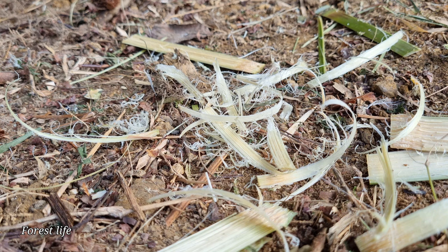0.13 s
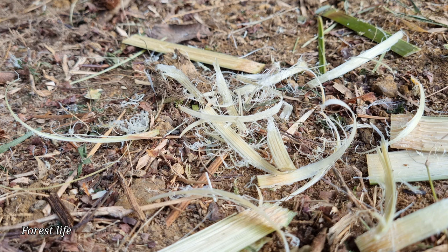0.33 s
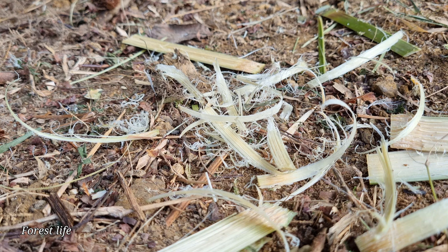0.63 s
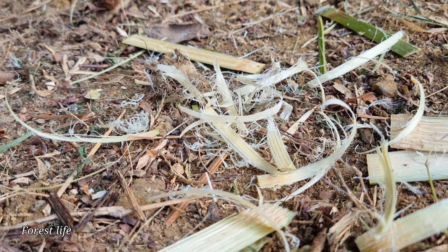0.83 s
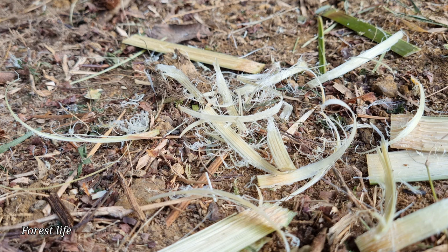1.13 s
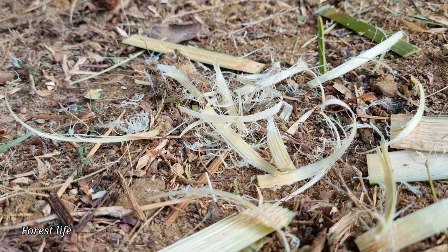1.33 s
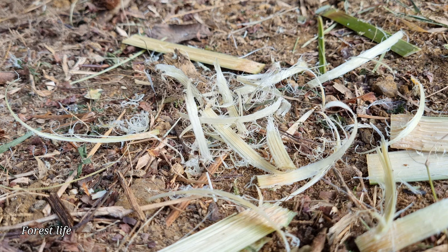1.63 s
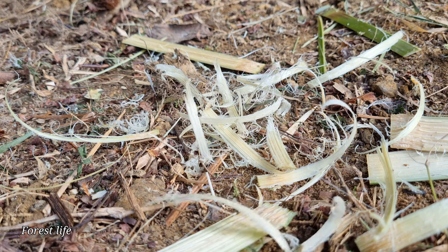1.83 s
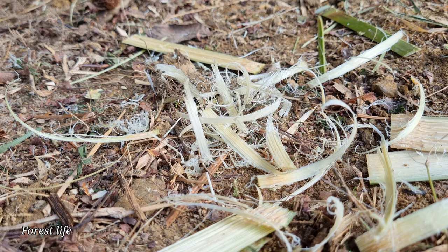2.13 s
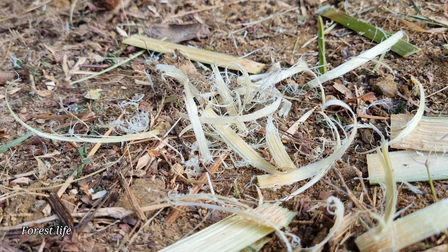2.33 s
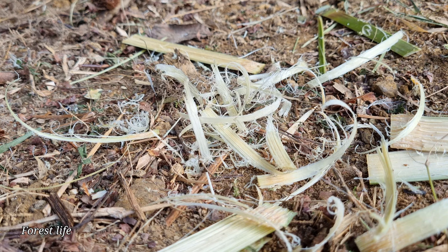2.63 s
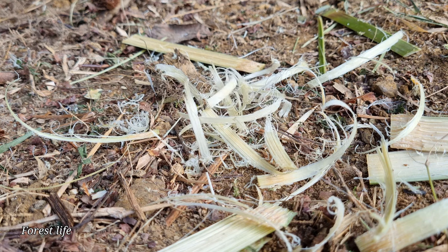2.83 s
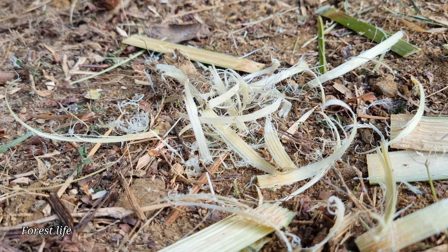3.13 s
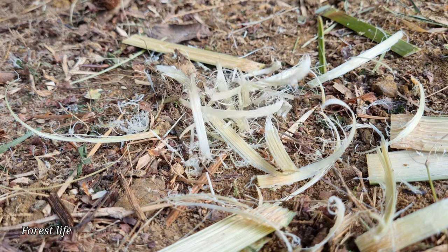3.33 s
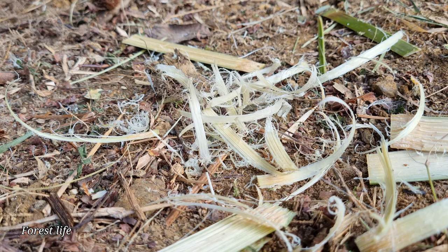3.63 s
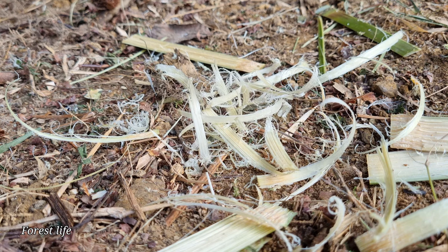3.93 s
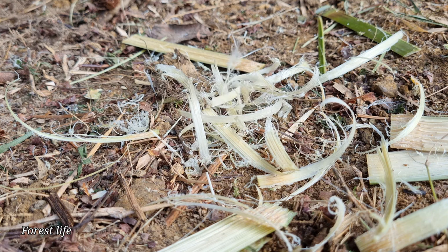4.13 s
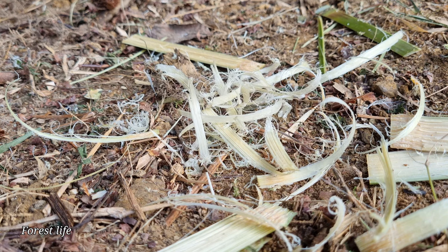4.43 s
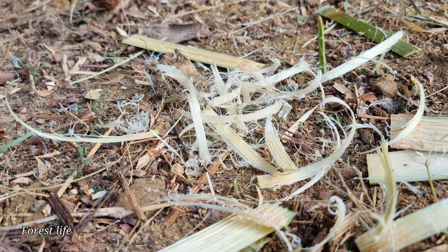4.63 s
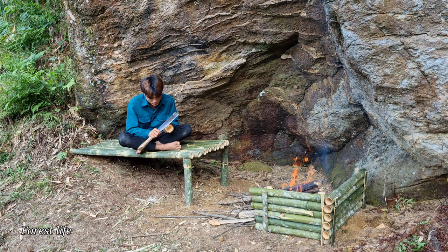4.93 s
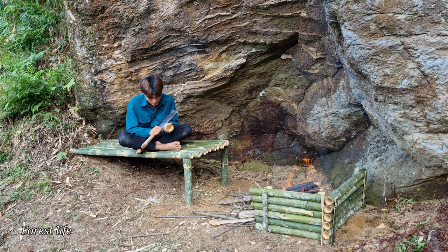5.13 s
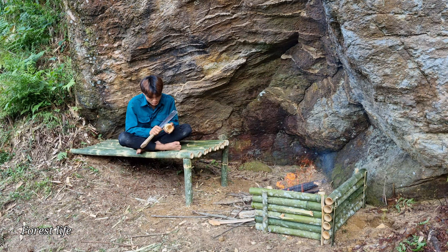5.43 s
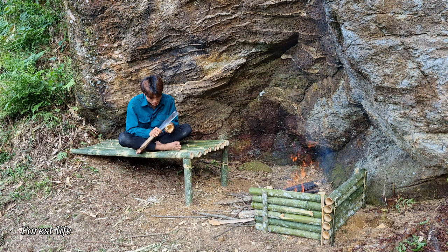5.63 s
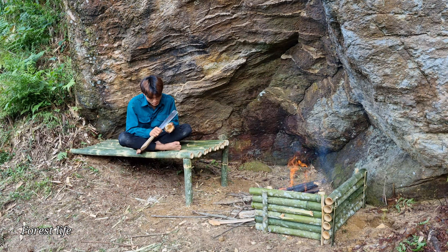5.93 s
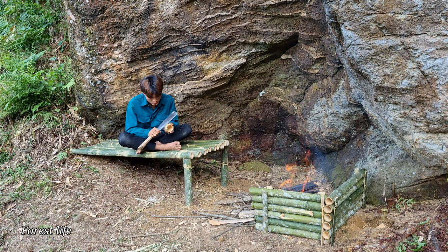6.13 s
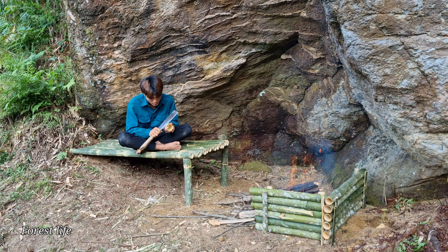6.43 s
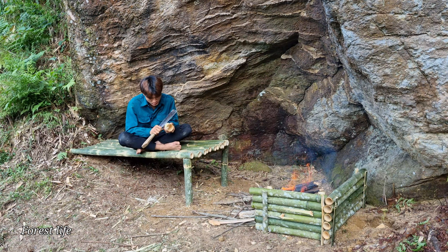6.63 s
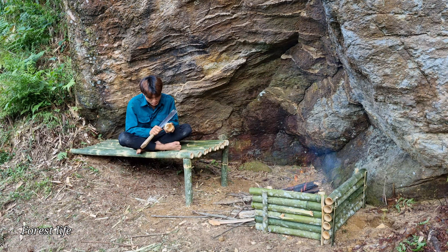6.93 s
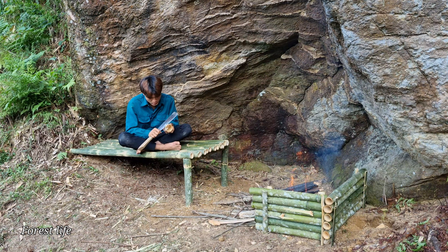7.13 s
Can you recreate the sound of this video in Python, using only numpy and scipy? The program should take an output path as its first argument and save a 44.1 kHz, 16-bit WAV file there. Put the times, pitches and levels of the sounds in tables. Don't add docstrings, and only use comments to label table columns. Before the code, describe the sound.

A close stereo pair beside a rock overhang hears a machete working down a bamboo tube. From 0 s the edge slips over fibres in short, bright, gritty hisses, with a thin steel ring and a slight hollow hum. The rasp swells rapidly into a sharp, woody crack at about 0.8 s, then again near 1.6, 2.3, 3.1, 3.8, 4.6 and 5.0 s; the fourth is softest and the last comes sooner. Cracks are dry and hollow, with splintering on top and very short stone and ground echoes. Light blade knocks and faint draws fill the gaps. Soft leaf hiss and low wind run beneath. Around 5.1-5.2 s the work ends and the background crossfades to a quieter, more distant spot: even forest hiss, weaker wind and fine, fluttering high insect sizzle until about 7.4 s.

```python
import sys
import numpy as np
from scipy import signal
from scipy.io import wavfile
from scipy.ndimage import uniform_filter1d

SR = 44100
rng = np.random.default_rng(int(sys.argv[2]) if len(sys.argv) > 2 else 0)


def store_pcm(level_fs):
    pcm = np.round(np.clip(level_fs, -1, 1) * 32767).astype(np.int16)
    wavfile.write(sys.argv[1], SR, np.atleast_2d(pcm).T)


def natural_amplitude(level_db):
    exponent = np.asarray(level_db, float) / 20
    return 10 ** exponent


N = 321475

# full_pressure_s, hold_s, fibre_hiss_db,
# edge_ring_db, tube_hum_db (last two relative to the hiss)
LANDING_SLIDES = [
    (0.002, .01, -42, -9, -6),
    (0.966, 0.03, -39, -5.5, -6.5),
    (1.762, 0.019, -37, -9, -6.5),
    (2.52, 0.019, -45.5, -6, 0.5),
    (3.203, .02, -38, -6.5, -6),
    (3.975, 0.01, -43.5, -9, -2),
    (4.753, .03, -51.5, -4, 0.5),
    (5.12, 0.023, -67, -7, 11),
]
DRAW_SLIDES = [
    (0.155, 0.0031, -38, 2.5, 0),
    (0.425, 0.051, -33.5, -5, -2.5),
    (1.19, 0.009, -32, -5, -5.5),
    (1.946, .04, -34.5, -3, -3),
    (2.7, 0.024, -35.5, -3, -3.5),
    (3.42, 0.017, -36.5, -2.5, 0.5),
    (4.184, 0.041, -39, -4, -0.5),
]
AIM_SLIDES = [
    (0.319, .005, -50, 1, 4),
    (0.6, 0.0084, -39, -5, -7),
    (1.397, .005, -46, -7, 2.5),
    (2.128, 0.0058, -44.5, -3, 1.5),
    (2.883, .01, -46, -7, -4),
    (3.63, 0.05, -48, -3.5, -2),
    (4.382, 0.014, -45.5, -4, -2.5),
]
SHAVE_SLIDES = [
    (0.716, 0.094, -35, -4, -4.5),
    (1.505, 0.051, -29.5, -4, -8),
    (2.262, 0.032, -32, -3, -4.5),
    (3.025, 0.027, -31, -7.5, -5.5),
    (3.745, .03, -34, -5, -6),
    (4.546, 0.04, -35.5, -4, -0.1),
    (4.955, 0.082, -41, -4, -2),
]
# centre_hz, width_hz, level_db
FIBRE_PEAKS = [(5800, 1800, -7), (8000, 600, -7), (9050, 300, -5), (10300, 2000, -2), (13500, 4000, -2)]
BLADE_PEAKS = [(2700, 700, -6), (3380, 120, 0), (3560, 300, -3), (4080, 250, -4), (4600, 800, -7)]
SPINE_PEAK = [(2005, 90, 0)]
TUBE_PEAKS = [(340, 80, -8), (670, 60, 0), (875, 80, -3), (1400, 600, -1)]
# start_s, blow_db, wall_db, splinter_db, tick_db (last three relative to the blow)
CRACK_EVENTS = [
    (0.805, -18.5, 0, -6.5, -42),
    (1.567, -15.5, -5.5, -6.5, -17),
    (2.3024, -15.5, -4.5, -5.5, -19.5),
    (3.082, -20.5, -4.5, -9.5, -20.9),
    (3.778, -16.5, -6.5, -5.5, -19),
    (4.593, -18.5, -2, -1.5, -15.5),
    (5.026, -17.5, -3.5, -7, -16.5),
]
# start_s, wall_db, air_column_db, splinter_db (last two relative)
KNOCK_EVENTS = [(0.418, -28.5, -6, 0), (0.461, -36, 2, -6), (1.507, -38.5, 1, 4.5),
                (1.759, -43.5, -0.5, -5), (1.837, -44, -3, -14), (2.271, -28, -8.2, -3),
                (2.516, -42.5, -9, -13), (3.019, -38.5, -5, 3), (3.207, -59, 10, 0), (3.401, -53, -10, -6),
                (3.75, -36.5, -18, -3), (3.827, -34.5, -4, -1.5), (3.971, -36, -5, -22),
                (4.546, -36.5, -3, -4), (4.657, -34.5, 0, -19), (4.816, -45, 0.5, -20),
                (5.083, -27, -11, -9.5)]
# pitch_hz, level_db, t60_s
AIR_MODES = [(102, -16, 0.084), (162.4, -13.5, 0.081), (240.5, -15, 0.087), (337, -5.5, 0.051),
             (351, 0.5, 0.045), (365, 10, 0.025), (438.3, -7, 0.049)]
WALL_MODES = [(507.4, -9, 0.085), (544.3, 1, 0.061), (633.6, 1.5, 0.047), (677.7, -2, 0.11),
              (735, -16, 0.054), (789, -3.5, 0.092), (870, -5, 0.093), (954, -20.5, 0.1)]
SPLINTER_MODES = [(1090, -23, 0.035), (1252, 5.5, 0.014), (1454, 13.5, 0.019), (1597, 8, 0.016),
                  (1830, -20, 0.018), (1935, 0.5, 0.041), (2122, -11, 0.06), (2288, -11, 0.069),
                  (2542, -9, 0.025), (2840, -11, 0.052), (3028, 4, 0.021), (3590, -8.5, 0.017)]
# delay_s, gain
ECHO_PATHS = [
    [(.0008, 0.41), (.003, 0.52), (.0064, 0.31), (.0095, 0.59), (.019, 0.02)],
    [(.0006, -0.3), (.0029, -0.52), (.0071, 0.58), (.0101, 0.32), (.021, 0.2)],
]
# pitch_hz, t60_s
ROCK_T60 = [(100, .11), (700, .1), (1500, .075), (3000, .09), (6000, .04), (14000, .028)]
# pitch_hz, level_db
NEAR_SPECTRUM = [(76, -48), (130, -1.5), (340, -7), (469, -15.5), (672, -10.5), (889, -19), (1090, -17),
                 (2230, -22.5), (2960, -20), (5620, -22.5), (6210, -21.5), (9840, -15.5), (15600, -18)]
FAR_SPECTRUM = [(76, -17), (130, -8.5), (228, -9), (522, 1), (829, 0), (1490, -3.5), (3010, -10.5),
                (5960, -15), (7440, -14.5), (8070, -13), (8920, -14), (14800, -18.5), (16000, -12.5)]
# pitch_hz, left_right_likeness
LIKENESS = [(60, 0.93), (130, 1), (290, 0.91), (640, 0.37), (1410, 0.52), (3100, 0.1), (6820, 0.29),
            (15000, 0.076)]
# pitch_hz, left_minus_right_db
BALANCE = [(60, 0), (240, 0.5), (950, 0.0), (3770, -0.5), (15000, -4)]
# time_s, level_db
WIND_LEVEL = [(0.0, -51), (0.34, -50), (1.44, -49.5), (1.89, -46), (2.25, -52.5), (2.84, -49.5),
              (2.98, -48.5), (3.13, -52.5), (4.04, -47.5), (4.47, -46), (4.97, -50), (5.36, -56.5),
              (6.03, -57.5), (6.19, -56.5), (6.88, -56.5), (7.29, -58)]
# pitch_hz, level_db_per_hz
GUST_SPECTRUM = [(8.8, -41), (15, -20), (38, 2), (80, 7), (99, -4.5), (123, -11.5), (210, -10.5),
                 (400, -20.5), (520, -68), (880, -120)]
# centre_hz, width_hz, level_db
INSECT_PEAKS = [(7900, 500, 0), (8380, 450, 0)]


def evened(x):
    return x / np.sqrt(np.mean(x ** 2) + 1e-20)


def read(points, hz):
    f, value = np.transpose(points)
    return np.interp(np.log(hz + 1), np.log(f + 1), value)


def add(mix, start_s, sound):
    part = mix[round(start_s * SR):][:len(sound)]
    part += sound[:len(part)]


def through(x, peaks):
    out = np.zeros(len(x))
    for k, (hz, width_hz, db) in enumerate(peaks):
        r = np.exp(-np.pi * width_hz / SR)
        poles = [1, -2 * r * np.cos(2 * np.pi * hz / SR), r * r]
        gain = (-1) ** k * natural_amplitude(db) * np.sqrt(1 - r) * np.sqrt(r)
        out += gain * signal.lfilter([1, 0, -1], poles, x)
    return evened(out)


def strokes():
    t = np.arange(round(5.3 * SR)) / SR
    shape = 4, len(t)
    slips_per_s = 3500
    size = natural_amplitude(3.0 * np.minimum(rng.exponential(1, len(t)), 5))
    slipping = rng.random(len(t)) < slips_per_s / SR
    slips = size * slipping * rng.standard_normal(shape)
    slips += 0.3 * rng.standard_normal(shape)
    # slides, rise_db_per_s, release_db_per_s, spine_ring_db
    kinds = [(LANDING_SLIDES, 1700, 220, -21), (DRAW_SLIDES, 365, 670, -10),
             (AIM_SLIDES, 250, 330, -15), (SHAVE_SLIDES, 420, 1800, -13.5)]
    level = np.zeros(shape)
    for slides, rise, release, spine_db in kinds:
        for s, hold_s, hiss_db, edge_db, tube_db in slides:
            near = slice(max(round((s - 0.3) * SR), 0), round((s + 0.5) * SR))
            early_s = np.maximum(s - t[near], 0)
            late_s = np.maximum(t[near] - s - hold_s, 0)
            pressure_db = hiss_db - rise * early_s - release * late_s
            level[:, near] += natural_amplitude(pressure_db) * natural_amplitude([[0], [edge_db], [spine_db], [tube_db]])
    out = level[0] * through(slips[0], FIBRE_PEAKS)
    out += level[1] * through(slips[1], BLADE_PEAKS)
    out += level[2] * through(through(slips[2], SPINE_PEAK), SPINE_PEAK)
    out += level[3] * through(slips[3], TUBE_PEAKS)
    return natural_amplitude(-8.5) * np.pad(out, (0, N - len(t)))


def ring(modes, rise_s, vary_db, phase_spread):
    t = np.arange(9000) / SR
    hz, db, t60_s = np.transpose(modes)[:, :, None]
    luck = rng.standard_normal((3, len(modes), 1))
    decay = natural_amplitude(db + vary_db * luck[0] - 60 * t / t60_s)
    phase = 2 * np.pi * hz * (1 + 0.003 * luck[1]) * t + phase_spread * luck[2]
    force = 1 - np.exp(-(t / rise_s) ** 2)
    return evened((decay * np.sin(phase)).sum(0) * force)


def crack(start_s, blow_db, wall_db, splinter_db, tick_db):
    t = np.arange(9000) / SR
    snaps = through(rng.standard_normal(len(t)),
                    [(4880, 3400, 14.7), (7090, 220, 19.0), (8960, 570, 11.5), (13200, 4800, 8.9)])
    tear = through(rng.standard_normal(len(t)), [(1343, 200, 3.5), (2370, 3900, -4.5), (3950, 230, -11)])
    snaps *= np.exp(-t / 0.00071) * (1 - np.exp(-t / 0.00022))
    tear *= np.exp(-t / 0.0021) * (1 - np.exp(-t / 0.0011))
    out = natural_amplitude(tick_db - 0.5) * evened(snaps)
    out += natural_amplitude(splinter_db - 3.0) * evened(tear)
    out += natural_amplitude(splinter_db - 3.5) * ring(SPLINTER_MODES, 0.0011, 0.24, 2.64)
    out += natural_amplitude(wall_db - 0.9) * ring(WALL_MODES[:4], 0.0034, 0.75, 1.23)
    out += natural_amplitude(splinter_db - 1.5) * ring(WALL_MODES[4:], 0.00083, 1.7, 2.27)
    out -= ring(AIR_MODES, 0.0056, 0.23, 0.65)
    return start_s - 0.0003, natural_amplitude(blow_db - 8.0) * out


def knock(start_s, wall_db, air_db, splinter_db):
    wall = ring(WALL_MODES[2:4], 0.0006, 2, 1)
    wall += 0.4 * ring(WALL_MODES[4:7], 0.0006, 2, 1)
    rest = natural_amplitude(air_db + 1.0) * ring(AIR_MODES[3:], 0.00095, 2.25, 0.64)
    rest += natural_amplitude(splinter_db - 2.5) * ring(SPLINTER_MODES, 0.0009, 3.5, 2.76)
    rest *= np.exp(-np.arange(len(rest)) / SR / 0.042)
    return start_s - 0.0006, natural_amplitude(wall_db - 15.5) * (wall + rest)


def overhang(x):
    right_lag_samples = 16
    taps = np.zeros((2, 12000))
    at = np.arange(60, 11740, 20) + rng.integers(0, 20, (2, 584))
    np.put_along_axis(taps, at, rng.choice([-1., 1.], at.shape), 1)
    hz, t, z = signal.stft(taps, SR, nperseg=128)
    z = z * natural_amplitude(-60 * t / read(ROCK_T60, hz)[:, None])
    tail = signal.istft(z, SR, nperseg=128)[1][:, :12000]
    tail[:, :60] = 0
    path = np.zeros(tail.shape)
    for side, echoes in enumerate(ECHO_PATHS):
        for delay_s, gain in echoes:
            add(path[side], delay_s, np.array([gain]))
    path = signal.lfilter(*signal.butter(2, 6500, fs=SR), path)
    path += natural_amplitude(-8.5) * tail / np.linalg.norm(tail[0])
    path[0, 0], path[1, right_lag_samples] = natural_amplitude(1.13), natural_amplitude(-1.5)
    path -= signal.lfilter(*signal.butter(1, 200, fs=SR), path - path.mean(0))
    return signal.fftconvolve(x[None], path, axes=1)[:, :N]


def hiss(spectrum, patchy_db, size=1024):
    right_lag_s = 0.0003
    frames, hz = 4 * N // size + 5, np.fft.rfftfreq(size, 1 / SR)
    a, b, c, d, patches = rng.standard_normal((frames, len(hz), 5)).T
    patches = uniform_filter1d(patches, size=14, axis=0)
    patches = evened(uniform_filter1d(patches, size=12, axis=1))
    same = np.clip(read(LIKENESS, hz), -1, 1)[:, None]
    left = a + 1j * b
    lag = np.exp(-2j * np.pi * hz * right_lag_s)[:, None]
    right = same * left * lag + np.sqrt(1 - same ** 2) * (c + 1j * d)
    lean_db = np.multiply.outer([0.5, -0.5], read(BALANCE, hz))[:, :, None]
    z = np.array([left, right]) * natural_amplitude(read(spectrum, hz)[:, None] + patchy_db * patches + lean_db)
    return evened(signal.istft(z, nperseg=size, noverlap=3 * size // 4)[1][:, :N])


def wind(t):
    buffet_db, buffet_s, lumps_db = -41.5, 0.015, 0.5
    rumble = hiss(GUST_SPECTRUM, patchy_db=0.5, size=4096)
    lumps = np.interp(t, np.arange(80) / 10, rng.standard_normal(80))
    buffets = sum(natural_amplitude(buffet_db) * np.exp(-abs(t - row[0]) / buffet_s) for row in CRACK_EVENTS)
    gusts = natural_amplitude(np.interp(t, *np.transpose(WIND_LEVEL)) + 3.5 + lumps_db * lumps)
    return (gusts + buffets) * rumble


def insects(t):
    flutter = evened(uniform_filter1d(rng.standard_normal((2, N)), size=150, axis=1))
    chirps = natural_amplitude(2.1 * flutter) * rng.standard_normal((2, N))
    chorus = np.array([through(through(c, INSECT_PEAKS), INSECT_PEAKS) for c in chirps])
    return natural_amplitude(-56) * chorus * np.clip((t - 5.05) / 0.18, 0, 1)


def forest():
    t = np.arange(N) / SR
    near_db, far_db, move_start_s, move_end_s = -45, -47, 5.1, 5.22
    far = np.clip((t - move_start_s) / (move_end_s - move_start_s), 0, 1)
    spots = np.sqrt(1 - far) * natural_amplitude(near_db) * hiss(NEAR_SPECTRUM, patchy_db=1.0)
    spots += np.sqrt(far) * natural_amplitude(far_db) * hiss(FAR_SPECTRUM, patchy_db=0.6)
    return spots + wind(t) + insects(t)


def scene():
    work = strokes()
    for row in CRACK_EVENTS:
        add(work, *crack(*row))
    for row in KNOCK_EVENTS:
        add(work, *knock(*row))
    return overhang(work) + forest()


def top_cut(x):
    return signal.sosfilt(signal.butter(12, 16800, fs=SR, output="sos"), x)


def record(dry):
    lowpass = signal.firwin(255, 15640, window=("kaiser", 5), fs=SR)
    mix = signal.oaconvolve(np.clip(dry, -1, 1), lowpass[None], "same")
    return top_cut(mix)


dry = scene()
out = record(dry)
store_pcm(out)
```